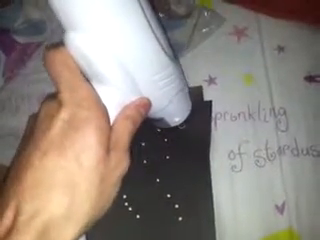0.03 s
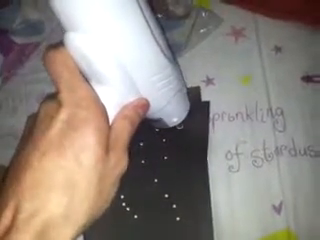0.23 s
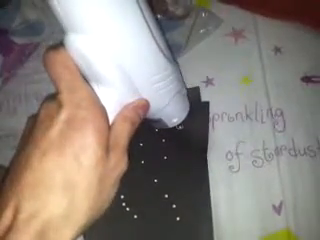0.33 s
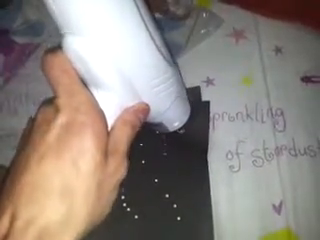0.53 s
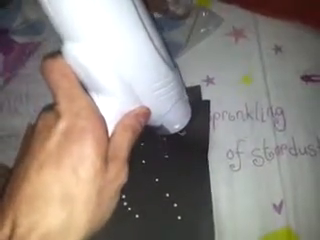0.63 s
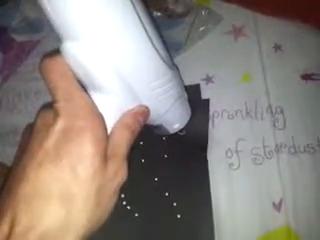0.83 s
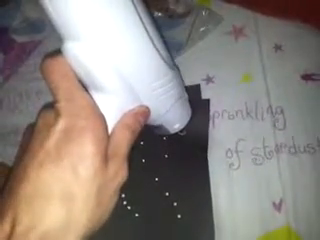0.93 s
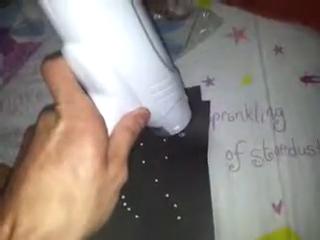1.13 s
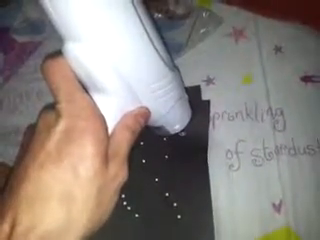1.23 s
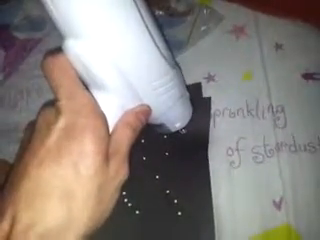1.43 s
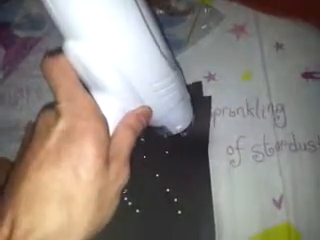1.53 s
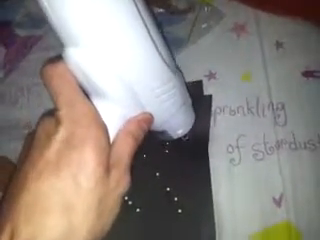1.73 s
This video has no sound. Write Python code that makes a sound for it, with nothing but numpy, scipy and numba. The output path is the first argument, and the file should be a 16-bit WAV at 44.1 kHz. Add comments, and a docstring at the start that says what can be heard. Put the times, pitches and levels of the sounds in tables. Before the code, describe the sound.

A handheld laser fires two loud, sharp snaps at cardboard, about a second apart, close to the microphone. Each has a light thump and a bright, short ring in a small hard room, over faint electrical hum and fan noise.

```python
"""A power supply hums under soft fan noise in a small hard room, heard on a phone's two microphones.
Close by, a handheld pulsed laser fires twice at black cardboard. Each shot is a shock pulse that
thumps the card and fills the room with a bright, ringing tail; between them the housing ticks faintly.
At this distance the phone overloads, then its wind filter cuts the bass and ducks the level briefly."""
import sys
import numpy as np
from scipy import signal
from scipy.fft import rfft, irfft
from scipy.io import wavfile
from scipy.ndimage import uniform_filter1d
from numba import njit

SR = 44100
rng = np.random.default_rng(int(sys.argv[2]) if len(sys.argv) > 2 else 0)


def unload_wav(signal):
    """Save mono or channel-first audio to the path in sys.argv[1] as 16-bit WAV at rate SR, clipped to [-1, 1]."""
    wavfile.write(
        sys.argv[1],
        SR,
        np.round(np.clip(np.atleast_2d(signal).T, -1, 1) * 32767).astype(np.int16),
    )


N = 79380

# mains harmonics of the power supply: f/Hz, level/dB
HUM_HARMONICS = [(102.3, -80.5), (150.7, -72), (199.2, -78), (301.5, -60), (349.9, -73.5), (500.6, -49.5),
                 (602.9, -66.5), (651.4, -71), (710.6, -65.5), (748.3, -71.5)]
# spectrum of the fan and room air: f/Hz, relative level/dB
AIR_SPECTRUM = [(30, -17), (100, -7.5), (280, -1), (400, -3), (580, 7), (820, -6), (1200, -5),
                (2300, -11.5), (4500, -14.5), (6300, -19.5), (8300, -16), (14400, -20.5)]
# laser shots: t/s, level/dB, thump/dB, thump tilt/(dB per octave), L-R/dB, tail tilt/(dB per octave)
LASER_SHOTS = [(0.2060, 2.5, -1, -0.5, 1.5, 4), (1.1773, 2, -1.5, 0.5, -3, 4)]
# modes of the card: f/Hz, level/dB, t60/s
CARD_MODES = [(121.2, -24.5, 0.034), (215, -10.5, 0.04), (261.5, -24.5, 0.097), (637, -27, 0.074),
              (778.5, -23, 0.12), (1363, -21, 0.059)]
# spectrum of the room tail before each shot's tilt: f/Hz, relative level/dB
TAIL_SPECTRUM = [(59, -50.5), (100, 5.5), (586, -11.5), (800, -12.5), (1370, -14), (1460, -17), (1690, -10),
                 (1920, -14.5), (2310, -10.5), (3810, -11.5), (4880, -7.5), (6140, -10.5), (7400, -5.5),
                 (14400, -15)]
# decay of the tail: f/Hz, t60/s
TAIL_DECAY = [(200, .15), (700, .22), (1400, .6), (2700, .58), (4200, .52), (7700, .455), (11000, .375),
              (14000, .3)]
# balance of the tail between the microphones: f/Hz, L-R/dB
TAIL_PAN = [(400, -13.5), (1300, 4), (2500, 5), (4400, 9.5), (8000, -2), (13000, 5)]
# long, thin resonances of the room: f/Hz, level/dB, t60/s
ROOM_RINGS = [(2665, -7, .38), (2683, -11, .36), (4140, -24, .4), (4922, -22, .33), (7380, -15, .31),
              (7630, -13, .31), (7900, -16, .31), (9295, -18, .29)]
# tick of the plastic housing: t/s, level/dB, f/Hz, decay/s
HOUSING_TICK = (0.8815, -37, 4100, .0012)

LEFT_RIGHT = np.array([[.5], [-.5]])  # splits a difference between the two microphones


def undb(db):
    """Decibels to gain."""
    return 10 ** (np.asarray(db) / 20)


def curve(table, hz):
    """Read (f/Hz, value) points on a log-frequency axis."""
    freqs, values = np.array(table, float).T
    return np.interp(np.log(np.maximum(hz, 1)), np.log(freqs), values)


def bins():
    """Frequency of each spectrum bin."""
    return np.arange(N // 2 + 1) * SR / N


def colour(noise, db):
    """Give white noise a spectrum and keep its power."""
    gain = undb(db)
    return irfft(rfft(noise) * gain / np.sqrt(np.mean(gain ** 2)), N)


def fade(age, t60):
    """Exponential decay by 60 dB in t60 seconds."""
    return np.exp(-np.log(1000) * age / t60)


def since(start):
    """Seconds since an event, zero before it."""
    return np.maximum(np.arange(N) / SR - start, 0)


def wander(per_s):
    """Glide between random values with a spread near 1."""
    hold = int(SR / per_s)
    steps = rng.standard_normal(200)[np.arange(N) // hold]
    return uniform_filter1d(steps, hold)


def supply_hum(gain_db=-1, spread_rad=0.49, waver_per_s=14):
    """Mains harmonics waver a little and reach the two microphones out of step."""
    t, out = since(0), 0
    for hz, db in HUM_HARMONICS:
        phase = rng.uniform(0, 2 * np.pi) + .1 * wander(waver_per_s) + LEFT_RIGHT * spread_rad
        rms = undb(db + gain_db + wander(waver_per_s))
        out += np.sqrt(2) * rms * np.sin(2 * np.pi * hz * t + phase)
    return out


def fan_air(gain_db=-53, wide_hz=1100):
    """Soft fan and room noise, nearer the centre in the bass and wide in the treble."""
    spectrum_db = curve(AIR_SPECTRUM, bins())
    mid, side = (colour(noise, spectrum_db) for noise in rng.standard_normal((2, N)))
    side = irfft(rfft(side) * np.clip(bins() / wide_hz, .55, 1), N)
    return undb(gain_db) * np.array([mid + side, mid - side])


def shock_crack(age, burst_db=6.5, burst_decay_s=0.002, push_db=-2.5, push_s=0.0009):
    """The direct shock from the spot that is hit: a push, a suction and a burst of noise."""
    push = (1 - age / push_s) * np.exp(-age / push_s)
    burst = rng.standard_normal((2, N)) * np.exp(-age / burst_decay_s)
    return (age > 0) * (undb(burst_db) * burst - undb(push_db) * push)


def card_thump(age, tilt_db):
    """The struck sheet thumps in a few short modes; an upward tilt makes it more of a hollow knock."""
    out, strongest_hz = 0, CARD_MODES[1][0]
    phases = rng.uniform(-1.3, 1.0, (len(CARD_MODES), 2, 1))
    for (hz, db, t60), phase in zip(CARD_MODES, phases):
        gain = undb(db + tilt_db * np.log2(hz / strongest_hz))
        out -= gain * fade(age, t60) * np.cos(2 * np.pi * hz * age + phase)
    return out * (age > 0)


def room_tail(age, echoes, tilt_db, gain_db=1, build_s=0.0037):
    """Dense echoes off the hard walls die away band by band, the middle treble last."""
    hz = bins()
    octaves = np.log2(np.maximum(hz, 100) / 6000)
    spectrum_db = curve(TAIL_SPECTRUM, hz) + tilt_db * octaves + LEFT_RIGHT * curve(TAIL_PAN, hz)
    spectrum = rfft(colour(echoes, spectrum_db))
    tail, bands = 0, np.round(np.sqrt(hz) / 4)
    for band in np.unique(bands):
        inside = bands == band
        t60 = curve(TAIL_DECAY, hz[inside].mean())
        tail += irfft(spectrum * inside, N) * fade(age, t60)
    early_dip_db = -2 * np.exp(-((age - 0.032) / 0.045) ** 2)  # the first wall echoes are a little softer
    return tail * undb(gain_db + early_dip_db) * (1 - np.exp(-age / build_s))


def room_rings(age, build_s=.14, spread_rad=1.2, waver_db=2.5, waver_per_s=70):
    """Thin resonances swell late inside the tail and beat unevenly."""
    out = 0
    for hz, db, t60 in ROOM_RINGS:
        phase = rng.uniform(0, 2 * np.pi) + .5 * wander(waver_per_s) + LEFT_RIGHT * spread_rad
        gain = undb(db + waver_db * wander(waver_per_s))
        out += gain * fade(age, t60) * np.sin(2 * np.pi * hz * age + phase)
    return out * (1 - np.exp(-(age / build_s) ** 2))


def laser_shots(shared_power=0.8):
    """Each pulse cracks near the phone, thumps the card and raises much the same echoes in the room."""
    out, shared_echoes = 0, rng.standard_normal((2, N))
    for start, db, thump_db, thump_tilt_db, pan_db, tail_tilt_db in LASER_SHOTS:
        age = since(start)
        fresh_echoes = rng.standard_normal((2, N))
        echoes = np.sqrt(shared_power) * shared_echoes + np.sqrt(1 - shared_power) * fresh_echoes
        direct = shock_crack(age) + undb(thump_db) * card_thump(age, thump_tilt_db)
        room = room_tail(age, echoes, tail_tilt_db) + room_rings(age)
        out += (direct + room) * undb(db + LEFT_RIGHT * pan_db)
    return out


def housing_tick():
    """One tiny click between the shots, like plastic settling in the hand."""
    start, db, hz, decay_s = HOUSING_TICK
    age = since(start)
    burst = rng.standard_normal((2, N)) * (age > 0) * np.exp(-age / decay_s)
    body = signal.lfilter(*signal.iirpeak(hz, Q=2.5, fs=SR), burst)
    return 2 * undb(db) * (body + .15 * burst)


def scene():
    """At the microphones: two close shots and a tick over the steady hum and fan."""
    return laser_shots() + housing_tick() + supply_hum() + fan_air()


@njit
def highpass(x, hz, damping=1.2):
    """Two-pole high-pass whose corner may move every sample."""
    out, band_state, low_state = np.empty(len(x)), 0., 0.
    for i in range(len(x)):
        g = np.tan(np.pi * hz[i] / SR)
        band = (band_state + g * (x[i] - low_state)) / (1 + g * (g + damping))
        low = low_state + g * band
        out[i] = x[i] - damping * band - low
        band_state, low_state = 2 * band - band_state, 2 * low - low_state
    return out


def lowpass(x, hz):
    """Steep elliptic cut of the top treble."""
    return signal.sosfilt(signal.ellip(10, .2, 70, hz, fs=SR, output="sos"), x)


def wind_filter(x, sense_hz=325, full_bass=0.25, cut_hz=1220, duck_db=-5.5):
    """A bass blast pushes a steep high-pass up and the level down; both react late and then relax."""
    react_s, slew_s, release_s = 0.055, 0.029, 0.059
    t = since(0)
    bass = signal.sosfilt(signal.butter(2, sense_hz, fs=SR, output="sos"), x)
    log_peak = np.log(np.abs(bass).max(axis=0) + 1e-9)
    release = t / release_s
    held_peak = np.exp(np.maximum.accumulate(log_peak + release) - release)  # jumps up, then decays
    delayed = np.interp(t - react_s, t, np.minimum(held_peak / full_bass, 1))
    drive = uniform_filter1d(delayed, int(slew_s * SR))
    corner_hz = np.maximum(cut_hz * drive, 1)
    for _ in range(3):
        x = np.array([highpass(channel, corner_hz) for channel in x])
    return x * undb(duck_db * drive)


def record(dry, overload=1.1, treble_cut_hz=14480, top_hz=15600):
    """The phone overloads and filters wind; the sound then clips at full scale and loses its top."""
    overloaded = np.clip(lowpass(dry, treble_cut_hz), -overload, overload)
    ducked = wind_filter(overloaded)
    clipped = np.clip(lowpass(ducked, treble_cut_hz), -1, 1)
    return lowpass(clipped, top_hz)


dry = scene()
out = record(dry)
unload_wav(out)
```